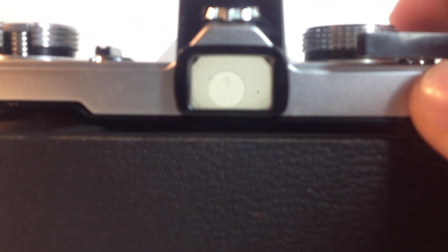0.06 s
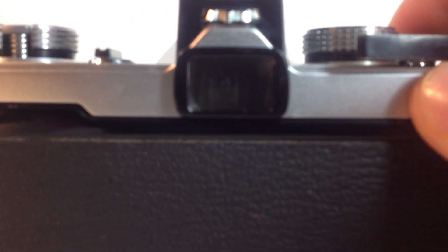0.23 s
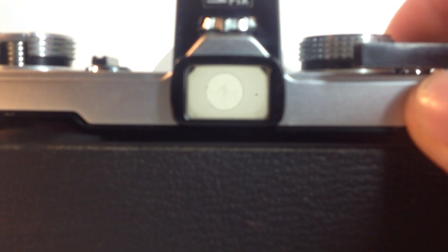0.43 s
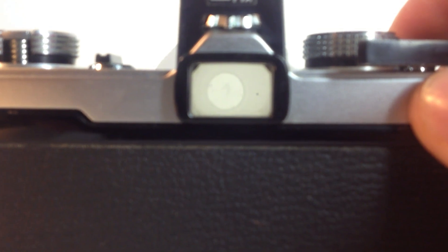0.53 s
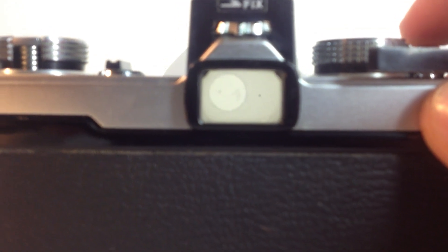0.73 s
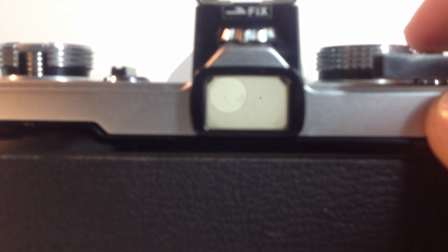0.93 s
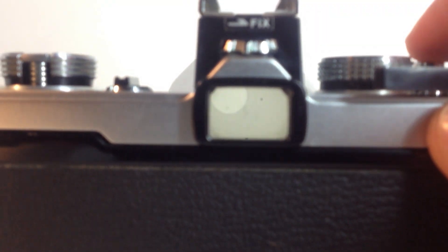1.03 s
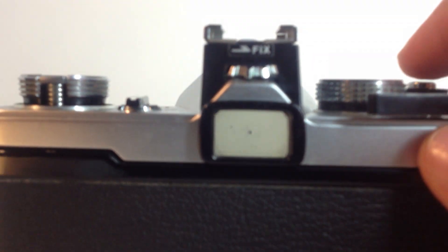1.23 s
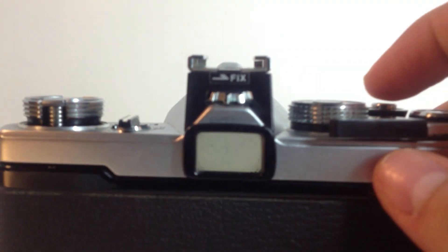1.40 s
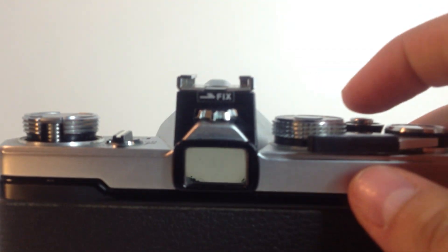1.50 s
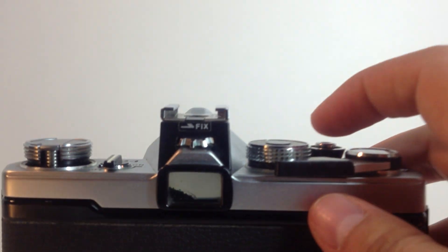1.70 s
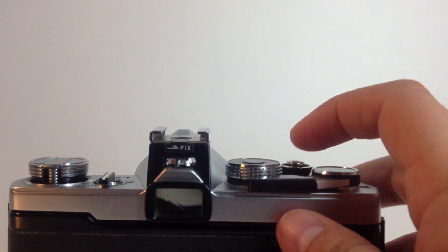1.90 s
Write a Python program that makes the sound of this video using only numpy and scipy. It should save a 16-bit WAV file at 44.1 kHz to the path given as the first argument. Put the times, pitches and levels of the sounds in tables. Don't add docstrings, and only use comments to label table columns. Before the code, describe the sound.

A mechanical film camera shutter fires close by in a quiet room: a fast cluster of hard metallic clacks, a lighter click soon after, then near silence, faint ticks and the soft start of the winding lever.

```python
import sys
import numpy as np
from scipy import signal
from scipy.fft import rfft, irfft, next_fast_len
from scipy.io import wavfile
from scipy.ndimage import uniform_filter1d, map_coordinates

SR = 44100
rng = np.random.default_rng(int(sys.argv[2]) if len(sys.argv) > 2 else 0)


def undo_db(level):
    steps = np.asarray(level, float) / 20
    return 10 ** steps


def generate_wav(signal):
    frames = np.transpose(np.atleast_2d(signal))
    scaled = np.clip(frames, -1, 1) * 32767
    pcm = np.round(scaled).astype(np.int16)
    wavfile.write(sys.argv[1], SR, pcm)


N = 85995


def unit(x):
    return x / np.sqrt(np.mean(x ** 2) + 1e-20)


def along(points, hz):
    f, value = np.transpose(points)
    return np.interp(np.log(hz + 1), np.log(f + 1), value)


def filtered(x, response):
    size = next_fast_len(len(x) + SR // 4)
    spectrum = rfft(x, size) * response(np.fft.rfftfreq(size, 1 / SR))
    return irfft(spectrum, size)[:len(x)]


def wobble(rate_hz):
    knots = rng.standard_normal(int(N * rate_hz / SR) + 4)
    return map_coordinates(knots, [np.arange(N) * rate_hz / SR])


def sines(tones):
    t = np.arange(N) / SR
    return sum(undo_db(db) * np.sqrt(2) * np.sin(2 * np.pi * hz * t) for hz, db in tones)


def resonances(peaks):
    sharpest_q, damped_hz = 24, 5000

    def response(f):
        total = 0
        for k, (hz, width, db) in enumerate(peaks):
            width = max(width, hz / sharpest_q * (1 + hz / damped_hz))
            peak = 1j * f * width / (hz * hz - f * f + 1j * f * width)
            total = total + (-1) ** k * undo_db(db) * peak
        return total
    return response


# pitch_hz, level_db (per Hz)
BARE_CLICK = [(300, -33), (700, -21), (1500, -8), (4500, -0.5), (9000, -8), (13000, -5), (15500, -6)]


def contact_voice(ring, slope_db):
    ringing, bare_db = resonances(ring), -5
    tilt_db = np.clip(slope_db, -3, 3)

    def voice(f):
        colour = ringing(f) + undo_db(bare_db + along(BARE_CLICK, f))
        return colour * undo_db(tilt_db * np.log2((f + 200) / 4000))
    return voice


def contact(t60_s, voice):
    rise_s, spiky_db, blow_s, blow_size = .00025, 2.5, .00008, 4
    even_s, even = .0015, .8
    t, band_hz = np.arange(SR // 5) / SR, np.arange(SR // 2)

    def smooth(power):
        return np.abs(uniform_filter1d(power, size=round(even_s * SR))) + 1e-12

    grit = rng.standard_normal(len(t)) * undo_db(spiky_db * rng.exponential(size=len(t)))
    shape = (1 - np.exp(-t / rise_s)) * undo_db(-60 * t / t60_s)
    chatter = filtered(unit(grit) * shape, voice)
    one_tap = filtered(1. * (t == t[1]), voice)
    mean_power = signal.fftconvolve(shape ** 2, one_tap ** 2)[:len(t)]
    chatter = chatter * (smooth(mean_power) / smooth(chatter ** 2)) ** (even / 2)
    blow = filtered(blow_size * t / blow_s * np.exp(-t / blow_s), voice)
    return (chatter + blow) / np.sqrt(np.mean(np.abs(voice(band_hz)) ** 2))


def part(contacts, ring):
    out = np.zeros(N + SR)
    for start_s, db, t60_s, slope_db in contacts:
        sound = contact(t60_s, contact_voice(ring, slope_db))
        out[round(start_s * SR):][:len(sound)] += undo_db(db) * sound
    return out[:N]


# multiple of 120 Hz, level_db (rms)
LAMP_HUM = [(2, -96), (3, -91.5), (4, -79.5), (5, -84), (6, -72.5), (7, -85), (8, -92), (16, -94.5)]


def lamp_hum():
    t, hum_hz, sway_db = np.arange(N) / SR, 120, 1
    out = np.zeros(N)
    for multiple, db in LAMP_HUM:
        wave = np.sin(2 * np.pi * (round(multiple) * hum_hz * t + rng.random()))
        out += undo_db(db + sway_db * wobble(4.8)) * np.sqrt(2) * wave
    return out


# pitch_hz, level_db (rms)
WHINE_TONES = [(2519, -95.5), (4990, -97), (11493, -102.5), (12430, -101), (13787, -103)]


def whine():
    return sines(WHINE_TONES)


# pitch_hz, level_db (per Hz)
HISS_COLOUR = [(100, -6), (220, -1.5), (700, -6), (2000, -11), (5000, -11), (10000, -15.5), (12500, -12.5),
               (15300, -10.5)]


def hiss():
    noise = rng.standard_normal(N)
    return undo_db(-69) * unit(filtered(noise, lambda f: undo_db(along(HISS_COLOUR, f))))


# start_s, level_db, t60_s (time to fade 60 dB), brightness_db (per octave)
TICK_CONTACTS = [
    (.1765, -54, .02, 0),
    (1.6630, -51, .014, 1),
    (1.6975, -62, .015, 0),
    (1.7280, -58, .015, 1),
    (1.7420, -64, .02, 0),
]
# pitch_hz, width_hz, level_db
TICK_MODES = [(2500, 800, -5), (4300, 1000, 3), (6000, 1500, -1), (8500, 2500, -2)]


def ticks():
    return part(TICK_CONTACTS, TICK_MODES)


# start_s, level_db, t60_s, brightness_db (per octave)
KNOCK_CONTACTS = [
    (.1775, -60, .09, -1),
    (.4290, -57, .07, -2),
    (.4845, -58, .07, -2),
    (.511, -64, .05, -2),
]
# pitch_hz, width_hz, level_db
KNOCK_MODES = [(500, 120, 3.7), (960, 120, 9.6), (1150, 70, 20), (1400, 130, 16), (2400, 300, 8),
               (4500, 900, 3.9)]


def knocks():
    return part(KNOCK_CONTACTS, KNOCK_MODES)


# start_s, level_db, upper_db (upper modes over the lowest two)
SHELL_PUSHES = [(0.178, -68, 0.5), (0.216, -59, 3.5), (0.225, -55, 3.5), (0.242, -53, 1),
                (0.261, -58.5, -1), (0.282, -60, 0), (0.305, -51.5, 0.5), (0.312, -47.5, -8),
                (0.319, -44.5, -9), (0.325, -52, 5.5), (0.337, -54.5, 12.5), (.352, -63.5, 2.5),
                (0.391, -61.5, -8), (.422, -71.5, 5.5), (0.66, -56.5, -14.5), (1.899, -69, -8),
                (1.901, -73, 2.5)]
# pitch_hz, width_hz, level_db
SHELL_MODES = [(124.75, 14, -27), (143, 29, -7.5), (210, 15, -4), (334, 7, -3.5), (412, 10, -10.5),
               (441, 9, -8), (598, 10, -12)]


def shell():
    t, push_s = np.arange(N) / SR, .001
    low_push, upper_push = np.zeros(N), np.zeros(N)
    for start_s, db, upper_db in SHELL_PUSHES:
        push = np.maximum(t - start_s, 0) / push_s * np.exp(-np.abs(t - start_s) / push_s)
        low_push += undo_db(db + 37.5) * push
        upper_push += undo_db(db + upper_db + 37.5) * push
    lowest = filtered(low_push, resonances(SHELL_MODES[:2]))
    return lowest + filtered(upper_push, resonances(SHELL_MODES[2:]))


# start_s, level_db, t60_s, brightness_db (per octave)
MIRROR_UP_CONTACTS = [(.2146, -44, .05, 0), (.2154, -33, .05, 0), (.2165, -21, .045, 1),
                      (.2215, -26, .06, 0), (.2240, -15, .025, 1), (.2268, -21, .025, -1),
                      (.2290, -20, .015, 0), (.2312, -23, .06, -1), (.2415, -28, .035, 0),
                      (.2470, -37, .1, -1), (.2535, -31, .03, 0), (.2590, -36, .15, -1),
                      (.2680, -36, .1, -1)]
# pitch_hz, width_hz, level_db
MIRROR_UP_MODES = [(496, 66, -4.5), (742, 160, 0), (1110, 370, -5.5), (2629, 330, 5.5), (3780, 83, 3.5),
                   (4620, 200, 7.5), (6560, 167, 2.5), (8975, 240, 0.5), (12200, 1500, -5.5)]


def mirror_up():
    return part(MIRROR_UP_CONTACTS, MIRROR_UP_MODES)


# start_s, pitch_hz, level_db, t60_s
PING_TONES = [(.2165, 755, -35, .04), (.2240, 783, -28, 0.032), (0.222, 2375, -27, 0.039),
              (0.226, 1073, -35, 0.061), (.2240, 506, -41.5, 0.037), (.2765, 972, -29.5, 0.032),
              (0.2767, 5170, -24, .02), (0.308, 313, -33, 0.037), (0.3121, 4540, -22.5, 0.051),
              (0.327, 3750, -26.5, 0.074), (.3275, 2370, -38.5, 0.034), (.345, 441, -44.5, 0.2),
              (0.347, 334, -61.5, 0.32), (.345, 949.5, -52, .22), (.345, 1400, -48, 0.094),
              (0.346, 598, -55, .2), (0.6582, 858, -46.5, 0.027), (0.6581, 1140, -31.5, 0.03),
              (0.663, 1402, -43.5, 0.092), (.675, 450, -57.5, 0.075), (1.902, 210, -59, 0.091)]


def pings():
    out, rise_s = np.zeros(N), 0.00072
    for start_s, hz, db, t60_s in PING_TONES:
        t = np.maximum(np.arange(N) / SR - start_s, 0)
        fade = undo_db(db - 60 * t / t60_s) * (1 - np.exp(-t / rise_s))
        out += fade * np.sin(2 * np.pi * hz * t)
    return out


# start_s, level_db, t60_s, brightness_db (per octave)
CURTAIN_CONTACTS = [
    (.2742, -18, 0.049, 0),
    (.2758, -20.5, 0.027, 0),
    (.2775, -9.5, 0.0077, 1),
    (.2800, -27.5, 0.036, -1),
    (.2850, -30, .06, 0),
    (.2915, -34, 0.083, -1),
]
# pitch_hz, width_hz, level_db
CURTAIN_MODES = [(1030, 110, -3.5), (1450, 110, -4.5), (2126, 280, -12.5), (2440, 200, -4),
                 (4700, 400, -6.5), (5670, 450, 3), (7000, 600, -8), (9200, 800, 0), (11400, 1200, -12.5)]


def curtain():
    return part(CURTAIN_CONTACTS, CURTAIN_MODES)


# start_s, level_db, t60_s, brightness_db (per octave)
MIRROR_DOWN_CONTACTS = [
    (.3045, -22, .045, 0),
    (.3072, -22, .045, 1),
    (.3118, -14, .015, 1),
    (.3133, -19, .03, 0),
    (.3205, -30, .07, -1),
]
# pitch_hz, width_hz, level_db
MIRROR_DOWN_MODES = [(419, 120, -12.5), (820, 300, -5.5), (1209, 230, -6.5), (2390.5, 240, -1.5),
                     (3010, 1100, -7), (4670, 250, 6), (6505, 400, -6), (7200, 660, -1), (8740, 400, -1.5),
                     (12240, 730, -3.5)]


def mirror_down():
    return part(MIRROR_DOWN_CONTACTS, MIRROR_DOWN_MODES)


# start_s, level_db, t60_s, brightness_db (per octave)
REBOUND_CONTACTS = [
    (.3270, -22, 0.043, -1.4),
    (.3310, -28, .05, -1),
    (.3362, -28, 0.061, -0.46),
]
# pitch_hz, width_hz, level_db
REBOUND_MODES = [(473, 76, -9.5), (797, 89.2, -6.5), (1300, 250, -3.5), (2260, 100, 0.5), (3750, 200, 2),
                 (4607, 350, 2), (5860, 500, -5), (7197, 540, 3.5), (9196, 900, -7.5)]


def rebound():
    return part(REBOUND_CONTACTS, REBOUND_MODES)


# start_s, level_db, t60_s, brightness_db (per octave)
MIRROR_RATTLE = [
    (0.341, -35.5, 0.11, 0),
    (.362, -41.5, 0.086, 0.016),
    (.395, -52.5, 0.27, 0),
]
CATCH_RATTLE_CONTACTS = [
    (0.6663, -41.5, 0.038, 0.8),
    (.678, -52, 0.067, 1),
]
FAINT_TICK_CONTACTS = [(.843, -70, .02, 3), (1.032, -66, .015, 3), (1.056, -69, .02, 3),
                       (1.108, -68, .02, 3), (1.642, -67, .015, 3)]
# pitch_hz, width_hz, level_db
RATTLE_MODES = [(890, 300, 4), (1500, 400, 3), (2300, 380, -3), (4550, 500, 0.5), (5830, 890, 1),
                (8416, 1800, -1.5), (11500, 2500, -6.5)]


def loose_parts():
    return part(MIRROR_RATTLE + CATCH_RATTLE_CONTACTS + FAINT_TICK_CONTACTS, RATTLE_MODES)


# start_s, level_db, t60_s, brightness_db (per octave)
SETTLE_CONTACTS = [
    (.4215, -51, 0.04, 0),
    (.4236, -39, 0.023, 0.83),
    (.4395, -51.5, 0.039, 0.053),
    (.5080, -65.5, 0.049, 1),
]
# pitch_hz, width_hz, level_db
SETTLE_MODES = [(2770, 670, 6), (4540, 280, 11), (6440, 1100, 4.5), (8640, 470, 7.5), (12100, 1500, -8)]


def settle():
    return part(SETTLE_CONTACTS, SETTLE_MODES)


SPRING_PITCHES = [436, 640, 788, 2140]
# level_db, t60_s
SPRING_FADES = [(-72.5, 3.2), (-71.5, 3.1), (-71.5, 2.2), (-66.5, 0.46)]


def springs():
    t = np.maximum(np.arange(N) / SR - 0.44, 0)
    out = np.zeros(N)
    for hz, (db, t60_s) in zip(SPRING_PITCHES, SPRING_FADES):
        out += undo_db(db - 60 * t / t60_s + 1.6 * wobble(4.8)) * np.sin(2 * np.pi * hz * t)
    return out


# start_s, level_db, t60_s, brightness_db (per octave)
CATCH_CONTACTS = [
    (.6548, -43, 0.027, 0.97),
    (.6562, -33.5, 0.032, 0.081),
    (.6578, -19.5, 0.012, 1),
    (.6605, -30, .014, 0),
]
# pitch_hz, width_hz, level_db
CATCH_MODES = [(511, 20, -13.5), (900, 88, 0), (1140, 45, 2.5), (1400, 40, -2), (2080, 150, 2),
               (4380, 330, 7.5), (5600, 400, 0), (7140, 360, 5), (9040, 900, 2.5), (12170, 1400, 1)]


def catch():
    return part(CATCH_CONTACTS, CATCH_MODES)


# start_s, level_db, t60_s, brightness_db (per octave)
LEVER_CONTACTS = [(1.9018, -45, .05, -1), (1.9032, -43.5, 0.065, -0.99), (1.9055, -41, 0.021, -1.9),
                  (1.909, -49, 0.061, -1.9), (1.9135, -52.5, 0.03, -0.6), (1.9163, -49, 0.052, -2.1),
                  (1.921, -52.5, 0.094, -2.2), (1.929, -50.5, .2, -2.9)]
# pitch_hz, width_hz, level_db
LEVER_MODES = [(450, 310, -0.5), (1110, 180, 3.5), (2384, 790, -1), (3680, 360, 7), (4490, 300, 10),
               (5840, 500, 5), (6770, 600, 6), (8370, 590, 6), (11600, 2200, -15.5)]


def lever():
    return part(LEVER_CONTACTS, LEVER_MODES)


# pitch_hz, t60_s
ROOM_FADES = [(100, .35), (350, .32), (800, .2), (4000, .19), (12000, .19)]


def room(x):
    hz, t, grains = signal.stft(rng.standard_normal(SR // 2), SR, nperseg=256)
    fade = undo_db(-60 * t / along(ROOM_FADES, hz)[:, None])
    tail = signal.istft(grains * fade, SR, nperseg=256)[1]
    delayed = np.pad(x, (round(.004 * SR), 0))
    return undo_db(-14.5) * signal.fftconvolve(delayed, tail / np.linalg.norm(tail))[:N]


def scene():
    background = lamp_hum() + whine() + hiss()
    camera = ticks() + knocks() + shell() + mirror_up() + pings() + curtain() + mirror_down()
    camera = camera + rebound() + loose_parts() + settle() + springs() + catch() + lever()
    return (camera + room(camera) + background)[None]


def low_pass(x):
    return signal.sosfilt(signal.butter(12, 16290, fs=SR, output="sos"), x)


def record(dry):
    bass_cut = signal.butter(N=6, Wn=108, btype="high", fs=SR, output="sos")
    noise, drift_hz = rng.standard_normal(N), 18
    drift = undo_db(-101) * unit(filtered(noise, lambda f: 1 / (1 + (f / drift_hz) ** 2)))

    def edge(f, top_hz, width_hz):
        return (1 - np.tanh((f - top_hz) / width_hz / 2)) / 2

    def treble_limit(f):
        return edge(f, 15330, 25) + undo_db(-38) * edge(f, 16400, 100)

    mix = filtered(signal.sosfilt(bass_cut, dry[0]) + drift, treble_limit)
    return low_pass(mix[None])


dry = scene()
out = record(dry)
generate_wav(out)
```